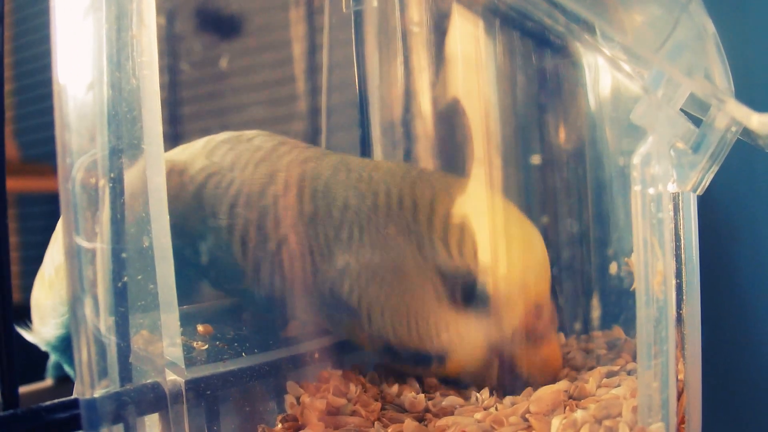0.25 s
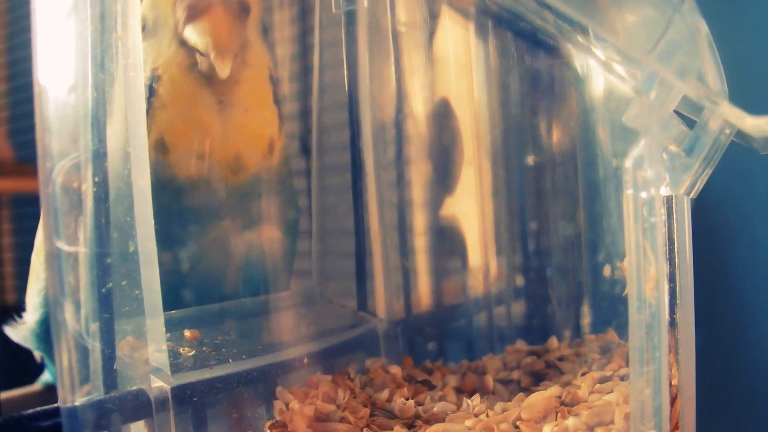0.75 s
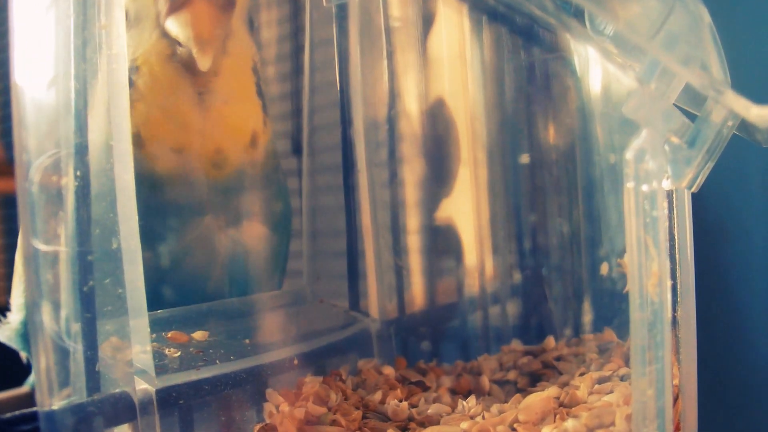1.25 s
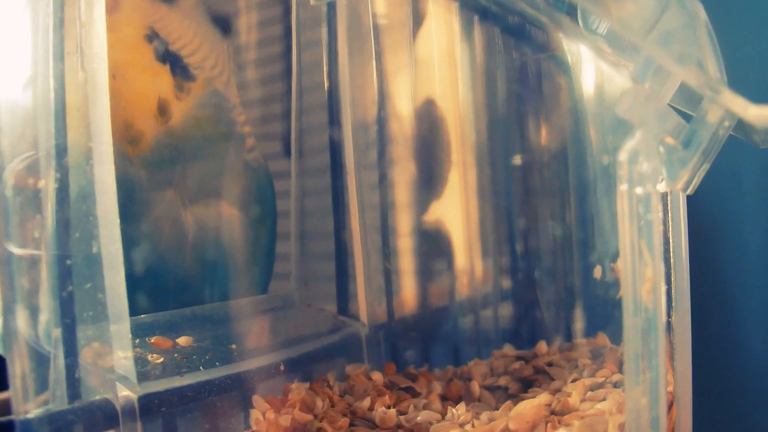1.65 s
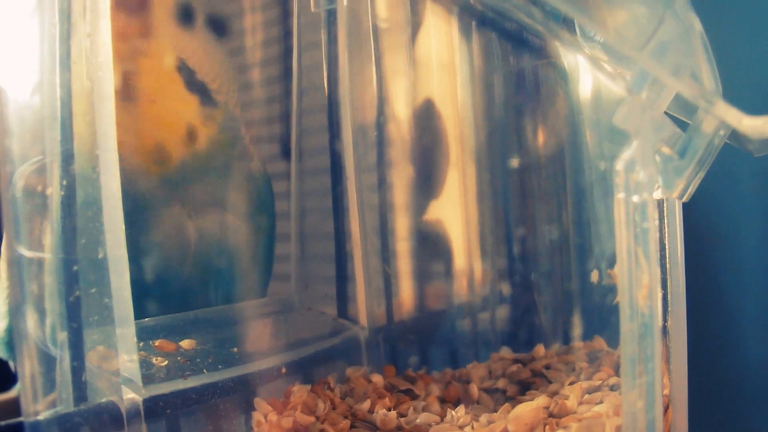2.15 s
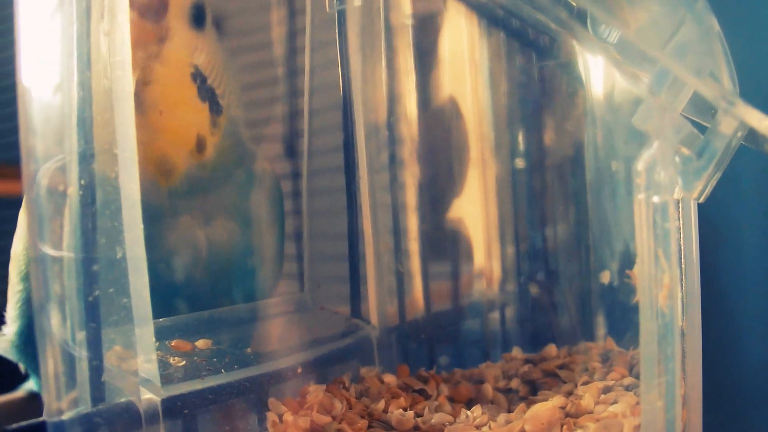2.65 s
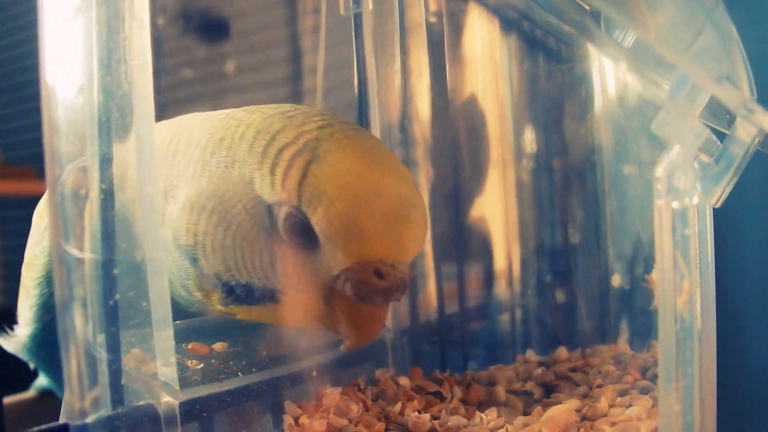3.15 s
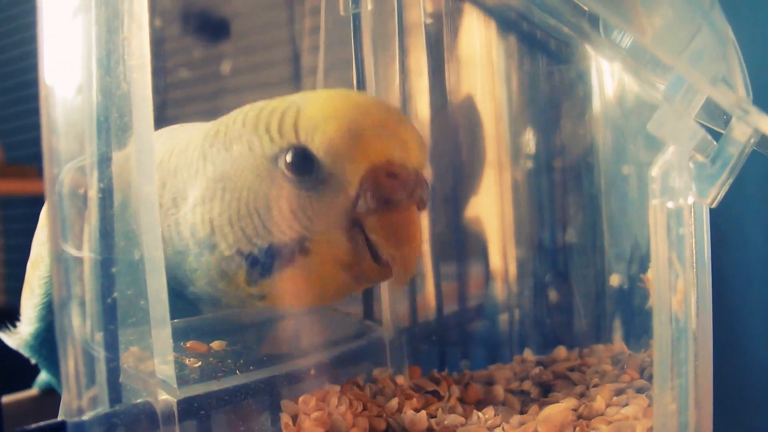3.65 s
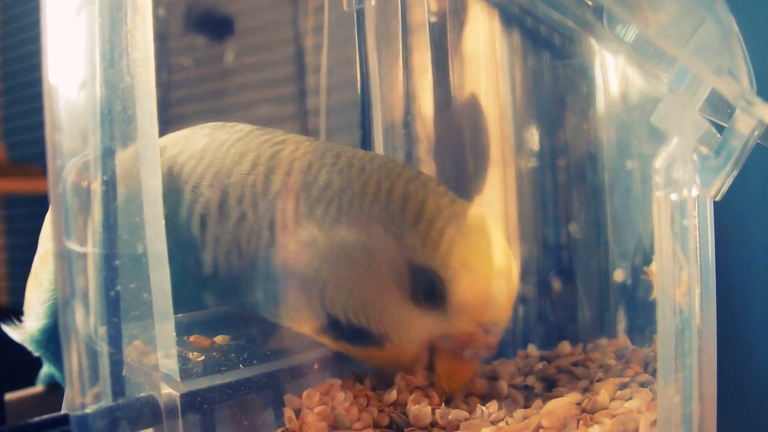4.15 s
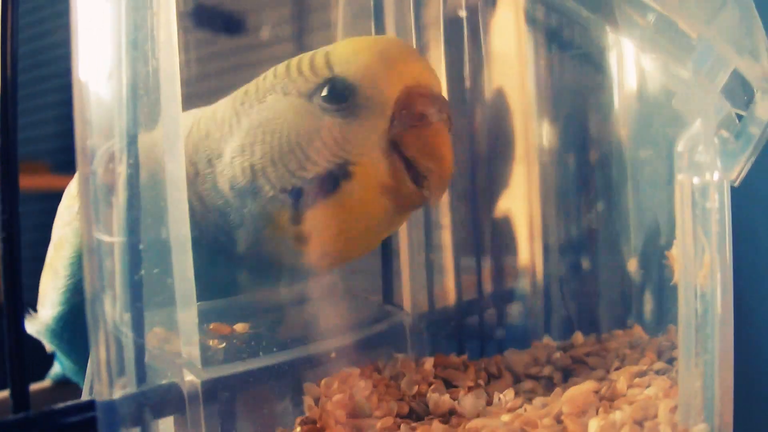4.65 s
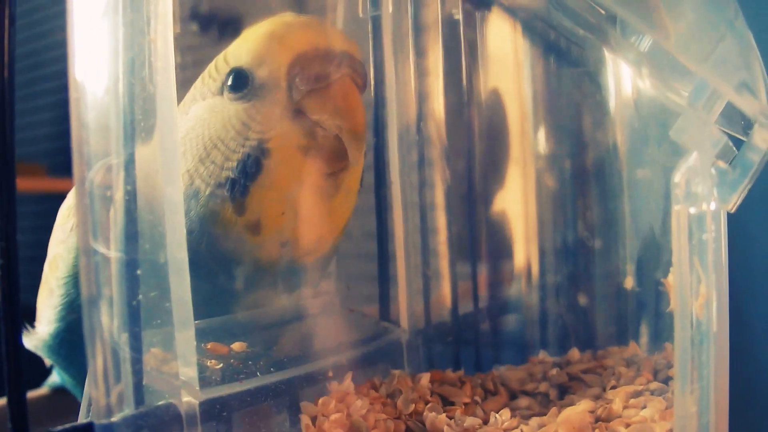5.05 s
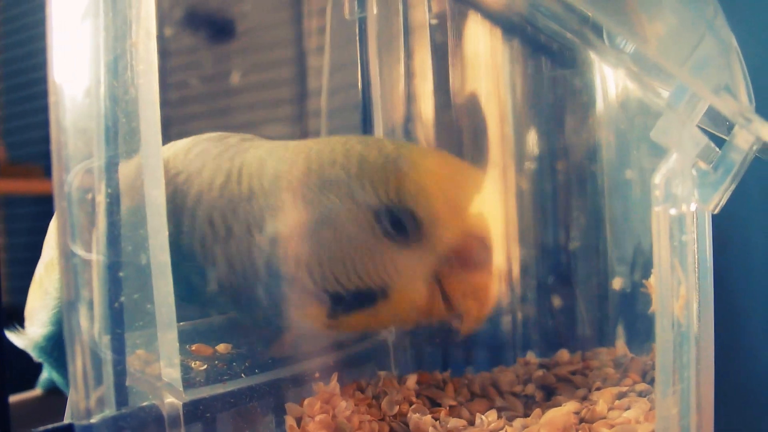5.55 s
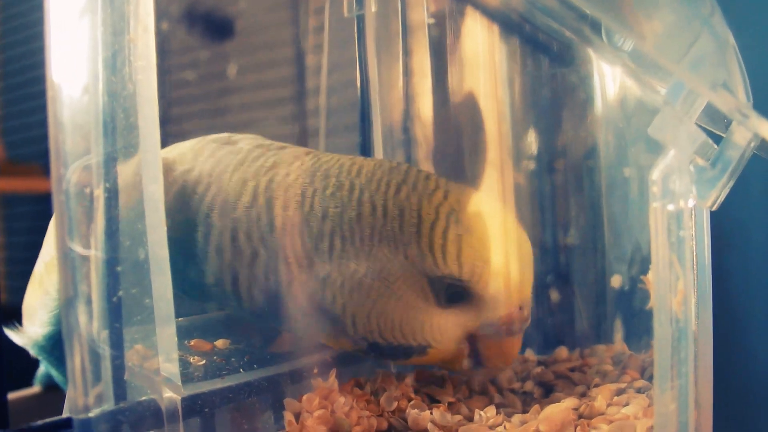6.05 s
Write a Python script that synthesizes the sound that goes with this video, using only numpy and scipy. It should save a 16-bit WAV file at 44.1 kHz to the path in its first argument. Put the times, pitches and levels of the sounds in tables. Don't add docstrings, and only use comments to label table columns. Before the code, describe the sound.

A small parrot hulls seed at a plastic feeder, heard closely in a small indoor room with steady soft hiss and a faint low drone. A sharp, loud crack opens at once, followed by lighter ticks and a snap at 0.3 s. Tearing crackle gathers around 0.5-0.6 s, then beak ticks and cracks at 0.75-1.1 s. After smaller flakes, strong snaps at 1.6-1.7 s lead into a dense run until 2.1 s. Isolated cracks come at 2.3, 2.6, 2.7 and 2.9 s, with ticks near 3.0 s. After a quieter pause, bright clicks at 3.7 s start another thick burst of cracking and grinding from 3.95 to 4.6 s. Delicate dry nibbles follow to 5.2 s, then soft knocks and sparse ticks through 6 s. A slight tear and small crack arrive at 6.3 s. Cracks rattle the plastic and fade quickly.

```python
import sys
import numpy as np
from scipy import signal
from scipy.fft import rfft, irfft
from scipy.io import wavfile
from scipy.ndimage import uniform_filter1d

SR = 44100
rng = np.random.default_rng(int(sys.argv[2]) if len(sys.argv) > 2 else 0)


def digitize_waveform(pressure):
    field = np.atleast_2d(pressure).T
    bounded = np.clip(field, -1, 1)
    quanta = np.round(bounded * 32767).astype(np.int16)
    wavfile.write(sys.argv[1], SR, quanta)


def boost(x):
    u = np.asarray(x, float) / 20
    return 10 ** u


N = 278712
SPAN, BURST = 2 ** 14, 2 ** 11
HISS_DB = -59


def colour(table, count):
    hz, db = np.transpose(table)
    bins = np.log(np.fft.rfftfreq(count, 1 / SR) + 1)
    return boost(np.interp(bins, np.log(hz), db))


def band(x, lo_hz, hi_hz):
    return signal.sosfilt(signal.butter(3, [lo_hz, hi_hz], "band", fs=SR, output="sos"), x)


def ring(x, hz, width_hz):
    return signal.lfilter(*signal.iirpeak(min(hz, 0.45 * SR), hz / abs(width_hz), SR), x)


def unit(x):
    return x / np.max(np.abs(x))


def add(out, x, s):
    i = int(s * SR)
    out[i:i + len(x)] += x[:len(out) - i]


def fade(t60_s, count):
    return np.exp(-np.log(1000) * np.arange(count) / SR / t60_s)


def broad(x, count, blur_hz):
    power = np.abs(rfft(x, count)) ** 2
    return np.sqrt(np.abs(uniform_filter1d(power, size=int(count * blur_hz / SR))))


def whiten(x, blur_hz):
    return irfft(rfft(x) / broad(x, BURST, blur_hz), BURST)


def splinter(rise_s, fall_s, scatter_db):
    t = np.arange(BURST) / SR
    snaps = rng.standard_normal(BURST) * boost(scatter_db * rng.standard_normal(BURST))
    snaps = snaps * (1 - np.exp(-(t / rise_s) ** 2)) * np.exp(-t / fall_s)
    return whiten(snaps, 700) * (t < 0.04)


def wall_echo(direct):
    delay_s, smear_s = 0.0100, 0.0003
    t = np.arange(BURST) / SR
    wall = rng.standard_normal(BURST) * (t > delay_s) * np.exp((delay_s - t) / smear_s)
    wall = ring(wall / np.sqrt(np.sum(wall ** 2)), hz=4400, width_hz=7000)
    return boost(-1.5) * signal.fftconvolve(direct, wall)


def hopper_rattle(direct):
    t = np.arange(BURST) / SR
    hopper = rng.standard_normal(BURST) * fade(0.035, BURST) * (t > 0.0005) / np.sqrt(SR / 1000)
    hopper = whiten(hopper, 500) * (t < 0.03)
    return boost(1) * signal.fftconvolve(direct, hopper)


def room_tail():
    # pitch_hz [Hz], t60_s [s]
    room_decay = [(400, 0.25), (3000, 0.22), (7000, 0.22), (11000, 0.16), (15000, 0.16)]
    hz, t60 = np.transpose(room_decay)
    bins = np.log(np.fft.rfftfreq(SPAN, 1 / SR) + 1)
    noise = rfft(rng.standard_normal(SPAN))
    tail = np.zeros(SPAN)
    for row, t60_s in zip(np.eye(len(hz)), t60):
        part = np.interp(bins, np.log(hz), row)
        tail += irfft(noise * part, SPAN) * fade(t60_s, SPAN)
    build_s = 0.016
    return tail * (1 - np.exp(-(np.arange(SPAN) / SR / build_s) ** 2)) / np.sqrt(SR / 1000)


def heard(direct, room_db):
    tint = broad(direct, SPAN, 500)
    out = boost(room_db - 7.5) * irfft(rfft(room_tail()) * tint, SPAN)
    add(out, boost(room_db / 2) * wall_echo(direct), 0)
    add(out, boost(room_db / 2) * hopper_rattle(direct), 0)
    add(out, direct, 0)
    return out


def hiss():
    # pitch_hz [Hz], level_db [dB per Hz]
    hiss_colour = [(12, -44), (20, -19), (43, -10.5), (234, -2.5), (542, 0), (1760, -8), (2020, -8.5),
                   (2530, -9), (3070, -8.5), (3630, -10.5), (4420, -11), (8180, -12.5), (13200, -20.5),
                   (16000, -12)]
    air = irfft(rfft(rng.standard_normal(N)) * colour(hiss_colour, N), N)
    step = SR // 5
    wander = uniform_filter1d(np.repeat(rng.standard_normal(N // step + 1), step)[:N], step)
    air = air + band(air, 100, 900) * (boost(2.5 * wander) - 1)

    whine_hz, whine_width_hz = 15525, 14
    drift = uniform_filter1d(rng.standard_normal(N), size=step) * np.sqrt(step) / 2
    whine = np.sin(2 * np.pi * np.cumsum(whine_hz + whine_width_hz * drift) / SR)
    drone = ring(rng.standard_normal(N), hz=225, width_hz=30)

    out = air / air.std() * boost(HISS_DB)
    out += drone / drone.std() * boost(-74)
    return out + whine / whine.std() * boost(-77)


def share(hz, at_4k_db, per_octave_db):
    return at_4k_db + per_octave_db * np.log2(hz / 4000)


def thump_share(hz, at_4k_db):
    return share(hz, at_4k_db, per_octave_db=-7)


def husk(burst, hz, low_db):
    body = band(burst, 1815, 7160)
    hollow = unit(ring(body, hz, 1.6 * hz)) + boost(-7) * unit(ring(burst, hz, 380))
    body = unit(boost(-17.5) * unit(body) + hollow)
    thump = unit(band(burst, 426, 1600) + boost(-0.5) * ring(burst, 650, 157))
    sizzle = unit(band(burst, 7740, 9980) + boost(-11.5) * band(burst, 9970, 21100))
    high_db = share(hz, at_4k_db=-12.5, per_octave_db=3)
    return body + boost(low_db + 3.0) * thump + boost(high_db + 8.0) * sizzle


def snaps():
    # start_s [s], level_db [peak dB], pitch_hz [Hz], thump_db [dB], room_db [dB]
    splits = [(0.0145, -9.5, 4920, -22, -7), (0.3024, -25, 2300, -14, -4), (0.5847, -17, 4840, -18.5, -2),
              (0.9641, -29, 5960, -24, -2), (0.9711, -19.5, 4500, -20, -1.5), (1.6251, -26, 2980, -31, 3),
              (1.6749, -15.5, 5470, -16, -5.5), (1.8647, -24, 6600, -25, -17), (1.8707, -21, 4430, -21, -3),
              (1.8799, -26.5, 3840, -11.5, 0), (1.8924, -22.5, 5160, -19, -2.5),
              (1.9164, -24, 4000, -18.5, 2), (2.1066, -23.5, 4550, -18.5, 2), (2.5981, -15, 4200, -23, -4),
              (2.7329, -24.5, 8000, -27.5, 0.5), (2.9071, -27, 3470, -19.5, -1.5),
              (3.9919, -23, 3720, -26, 1.2), (4.0672, -17.5, 2970, -36, -9),
              (4.1163, -21.5, 2600, -20, -1.5), (4.2229, -21.5, 2340, -19, -0.5),
              (4.256, -23.5, 4020, -17.5, 4.5), (4.3966, -24, 2460, -10, -2), (4.4867, -24, 3430, -16, 4),
              (6.3121, -28, 2940, -17, 3)]
    # start_s [s], #
    # level_db [peak dB], pitch_hz [Hz], room_db [dB]
    softer_cracks = [(0.244, -31, 3680, 0.5), (0.2962, -34.5, 3100, 5), (0.9488, -31.5, 2120, 1),
                        (1.0886, -32, 2770, -5), (1.1333, -33, 2830, -2.5), (1.2331, -50, 3350, -11),
                        (1.3753, -44, 2180, -6), (1.639, -30.5, 2230, -17), (1.8503, -28.5, 3440, 0),
                        (1.9505, -33, 3100, -14), (3.1299, -49, 2290, -1), (4.3867, -43.5, 2020, 8),
                        (4.4698, -33, 2290, 1), (4.6946, -47.5, 2190, 4),
                        (1.0127, -31, 4070, -2), (1.0566, -40.5, 4780, 8), (1.2876, -41, 6700, 12),
                     (1.296, -36.5, 4040, -2), (1.583, -32.5, 5450, 1.5), (1.9969, -36, 4500, -5),
                     (2.047, -38, 5810, -3), (2.081, -36, 7100, 2), (2.221, -38, 6400, 1.5),
                     (2.281, -43, 6030, -9), (2.535, -58, 8400, 13), (2.7339, -39, 8100, 7),
                     (2.9429, -38.5, 6800, 4), (3.165, -40, 5170, 1.5), (3.286, -46, 6450, -3),
                     (3.9507, -31.5, 6900, 4), (3.963, -38, 4370, -8), (4.3107, -30.5, 7100, -9),
                     (4.4392, -34.5, 5700, 3), (4.4962, -40, 4840, 9), (4.657, -43, 7600, -10),
                     (5.5985, -42, 8200, 0)]
    pieces = list(splits)
    for s, db, hz, room_db in softer_cracks:
        pieces.append((s, db, hz, thump_share(hz, -16.5), room_db))
    out = np.zeros(N)
    for s, db, hz, low_db, room_db in pieces:
        snap = husk(splinter(rise_s=0.00024, fall_s=0.0012, scatter_db=3.0), hz, low_db)
        add(out, boost(db - 1.0) * heard(snap, room_db), s)
    return out


def grind():
    # start_s [s], level_db [dB]
    effort = [(0.03, -57), (0.15, -59), (0.87, -61), (0.98, -55.5), (1.41, -62), (1.64, -55.5), (1.76, -54),
              (2.38, -63), (2.72, -58.5), (3.22, -76), (3.46, -61), (4.01, -61), (4.13, -54.5), (4.38, -56),
              (4.6, -54.5), (4.69, -62), (5.11, -62.5), (6.32, -60.5)]
    # pitch_hz [Hz], level_db [dB per Hz]
    husk_colour = [(120, -34), (200, 17), (254, -52), (491, -1), (1370, -37), (2170, -0.5), (2560, -7),
                   (4430, -6.5), (9230, -10.5), (12600, -14), (16000, -36)]
    s, db = np.transpose(effort)
    grains = (rng.random(N) < 1200 / SR) * rng.standard_normal(N)
    grains = grains * boost(3.0 * np.minimum(rng.exponential(size=N), 3.5))
    smear = whiten(rng.standard_normal(BURST) * fade(0.011, BURST), 300)
    smear = smear * (np.arange(BURST) < BURST // 2)
    smeared = signal.fftconvolve(grains, smear)[:N]
    x = band(irfft(rfft(smeared) * colour(husk_colour, N), N), 356, 15600)
    power = boost(np.interp(np.arange(N) / SR, s, db)) ** 2 - boost(HISS_DB - 3.5) ** 2
    return x / x.std() * boost(0.5) * np.sqrt(np.maximum(power, 0))


def ticks():
    # start_s [s], level_db [peak dB], pitch_hz [Hz], mid_db [dB], room_db [dB]
    hulling = [(0.1258, -25.5, 14800, -10, -2), (0.19, -36, 14000, -17, -13), (0.1997, -37.5, 8250, -3, 5),
               (0.2948, -26, 12300, -4, -13), (0.7473, -37.5, 14700, -30.5, 1),
               (0.7594, -45, 11300, 4, -12), (0.7836, -27, 9640, -10, -32), (0.7964, -29.5, 9000, -8, -2),
               (0.8126, -28.5, 11400, 0, -19), (0.85, -42.5, 14700, -12, 7), (1.9769, -54, 14100, -11, -7),
               (1.9874, -40, 14100, -10, -11), (2.007, -42, 14000, -8, -9), (2.0616, -35, 9100, -7, -12),
               (3.014, -29.5, 14900, -2.5, -12), (3.022, -32, 14400, -11, -9),
               (3.6601, -35.5, 8770, -20, -17), (3.702, -23, 14200, -8.5, -6),
               (3.712, -16, 15000, -13.5, -12), (3.763, -41.5, 14500, -5, 5),
               (3.7767, -29, 14200, -4.5, -7), (4.0672, -20.5, 9500, -7, 0), (4.2064, -26, 10000, -12, -1),
               (4.256, -28, 14200, -12, -1)]
    # start_s [s], level_db [peak dB], pitch_hz [Hz], mid_db [dB]
    nibbles = [(4.74, -42, 7850, -9), (4.7752, -24.5, 12700, -12.5), (4.78, -41.5, 10100, 0.5),
               (4.838, -46, 9500, -1), (4.8698, -39.5, 12100, -2), (4.9392, -35, 13700, -14),
               (4.9457, -30, 12100, -14), (4.9577, -39, 10500, -4), (4.9874, -43, 8450, -2),
               (5.075, -43.5, 9570, -10), (5.0897, -47, 8810, 6), (5.1532, -39.5, 14200, -1),
               (5.1644, -58, 9410, -7), (5.6623, -41, 9410, -14), (5.675, -47.5, 9540, -5),
               (5.8005, -46, 9630, -6), (5.883, -47, 12500, -6), (5.9047, -45, 14500, -7)]
    clicks = [(-27.5, *row) for row in hulling]
    for s, db, hz, mid_db in nibbles:
        room_db = -19 + 0.4 * (db + 35)
        clicks.append((-22.5, s, db, hz, mid_db, room_db))
    out = np.zeros(N)
    for low_db, s, db, hz, mid_db, room_db in clicks:
        low_db = low_db - 0.18 * (db + 35)
        burst = splinter(rise_s=0.000098, fall_s=0.00072, scatter_db=4)
        top = unit(unit(band(burst, 7940, 18000)) + boost(-6.5) * unit(ring(burst, hz, 620)))
        low = boost(low_db + 10.0) * unit(band(burst, 670, 1560))
        mid = boost(mid_db - 2.0) * unit(band(burst, 1930, 6470))
        add(out, boost(db - 1.0) * heard(top + low + mid, room_db), s)
    return out


def tears():
    # start_s [s], level_db [peak dB], pitch_hz [Hz], swell_s [s]
    slow_tears = [(0.4822, -30, 8040, 0.0021), (0.4969, -30, 7000, 0.0074), (0.5186, -36.5, 5000, 0.0036),
                  (0.544, -27.5, 5850, 0.00067), (0.5543, -32.5, 4430, 0.0034), (0.5805, -25, 5100, 0.004),
                  (0.934, -31.5, 4030, 0.013), (1.069, -32, 5000, 0.0034), (1.11, -44, 2120, 0.0089),
                  (1.7524, -30, 5000, 0.0048), (1.77, -19.5, 8440, 0.00057), (1.8112, -19.5, 8460, 0.0016),
                  (1.8294, -33, 5340, 0.0043), (2.0565, -35, 4920, 0.0029), (2.1161, -27.5, 3200, 0.0025),
                  (2.3307, -34, 3380, 0.0077), (2.343, -25, 4050, 0.0043), (2.559, -29, 6440, 0.0039),
                  (3.033, -37.5, 7540, 0.0043), (3.0518, -41, 3840, 0.0031), (3.4462, -37, 3730, 0.0027),
                  (4.0091, -32, 5860, 0.0015), (4.0884, -20.5, 3370, 0.0043), (4.1314, -30, 4900, 0.003),
                  (4.2112, -24, 2140, 0.0048), (4.5132, -25.5, 5100, 0.0031), (4.537, -35.5, 5210, 0.0092),
                  (4.6118, -38.5, 2670, 0.0034), (6.1825, -51.5, 5870, 0.023), (6.303, -36, 2820, 0.0046)]
    out = np.zeros(N)
    for s, db, hz, swell_s in slow_tears:
        burst = splinter(rise_s=swell_s, fall_s=1.6 * swell_s, scatter_db=6.0)
        tear = husk(burst, hz, thump_share(hz, -21))
        add(out, boost(db - 8.0) * heard(tear, room_db=1.5), s)
    return out


def knocks():
    # start_s [s], level_db [peak dB], pitch_hz [Hz], t60_s [s]
    taps = [(0.639, -45.5, 453, 0.097), (0.768, -45.5, 900, 0.046), (0.79, -45.5, 710, 0.025),
            (3.014, -49, 880, 0.021), (4.544, -52.5, 223, 0.24), (0.829, -52, 547, 0.11),
            (1.584, -39.5, 366, 0.02), (3.659, -45.5, 1180, 0.015), (3.874, -44.5, 1070, 0.016),
            (4.868, -46, 1150, 0.029), (5.283, -42.5, 800, 0.03), (5.3, -48.5, 620, 0.032),
            (5.678, -41, 880, 0.011), (5.711, -46.5, 405, 0.057), (0.511, -39, 960, 0.012),
            (5.798, -49, 1280, 0.012), (5.995, -46, 1180, 0.012), (6.079, -55, 700, 0.015)]
    out = np.zeros(N)
    for s, db, hz, t60_s in taps:
        push = splinter(rise_s=0.003, fall_s=0.0011, scatter_db=6.5)
        width_hz = np.log(1000) / (np.pi * t60_s)
        tap = unit(ring(push, hz, width_hz)) + boost(3) * unit(band(push, 0.4 * hz, 1.9 * hz))
        add(out, boost(db + 1.0) * heard(unit(tap), room_db=-15), s)
    return out


def scene():
    return (hiss() + snaps() + grind() + ticks() + tears() + knocks())[None]


def low_pass(x):
    return signal.sosfilt(signal.butter(12, 16700, fs=SR, output="sos"), x)


def record(dry):
    # pitch_hz [Hz], width_hz [Hz]
    notches = [(2552, 90), (3601, 150), (4151, 85), (4651, 85), (12941, 420), (14987, 420)]
    mix = dry
    for hz, width_hz in notches:
        mix = signal.lfilter(*signal.iirnotch(hz, hz / width_hz, SR), mix)
    top_hz = 15760
    mix = signal.sosfilt(signal.ellip(10, 0.2, 34, top_hz, fs=SR, output="sos"), mix)
    return low_pass(mix)


dry = scene()
out = record(dry)
digitize_waveform(out)
```